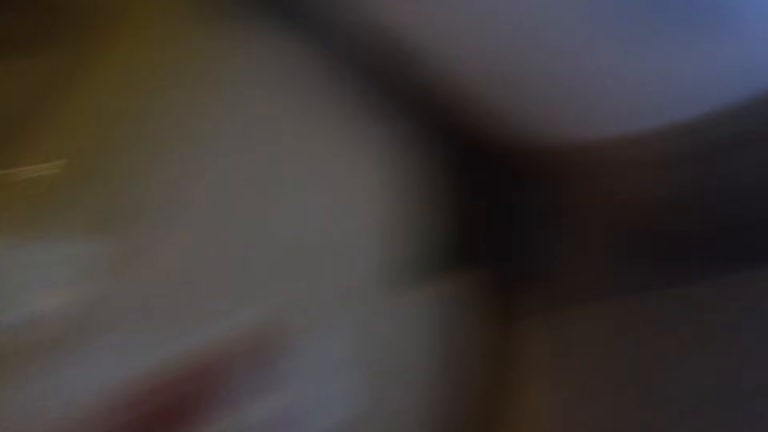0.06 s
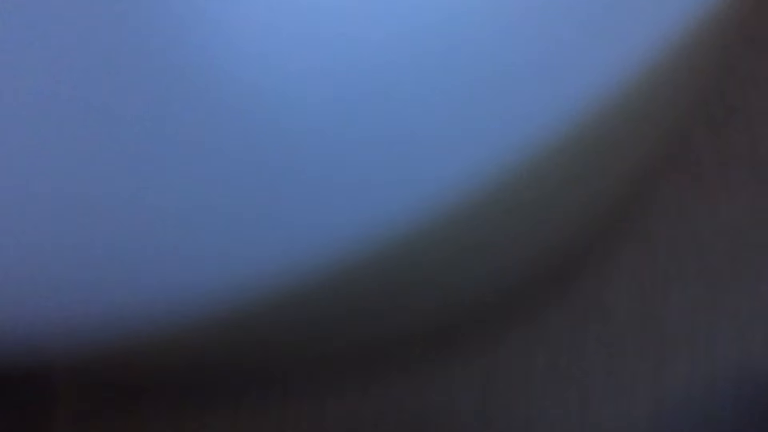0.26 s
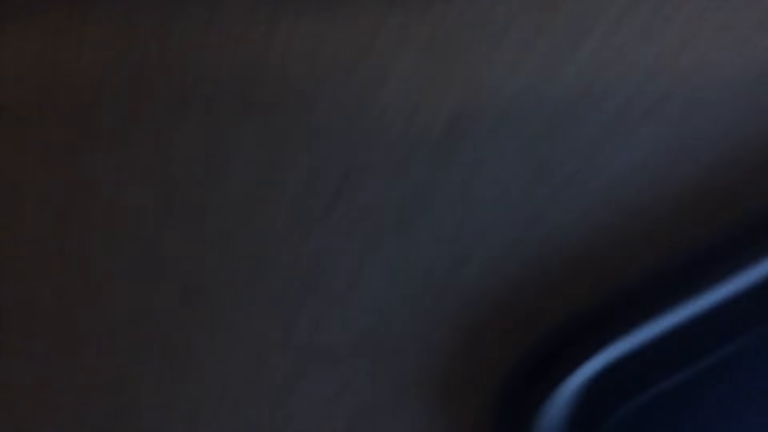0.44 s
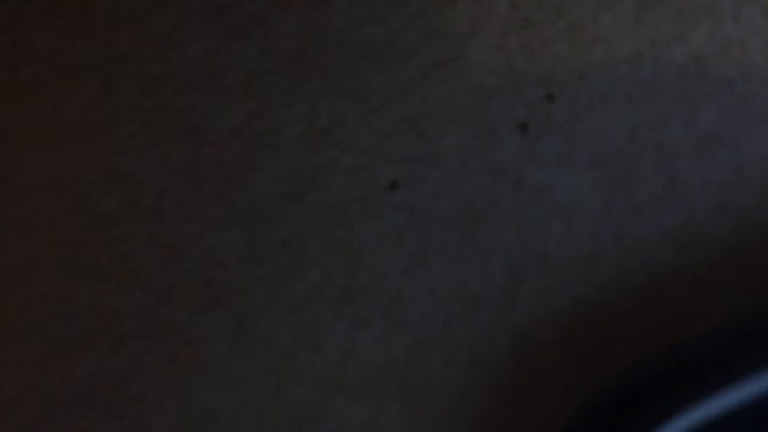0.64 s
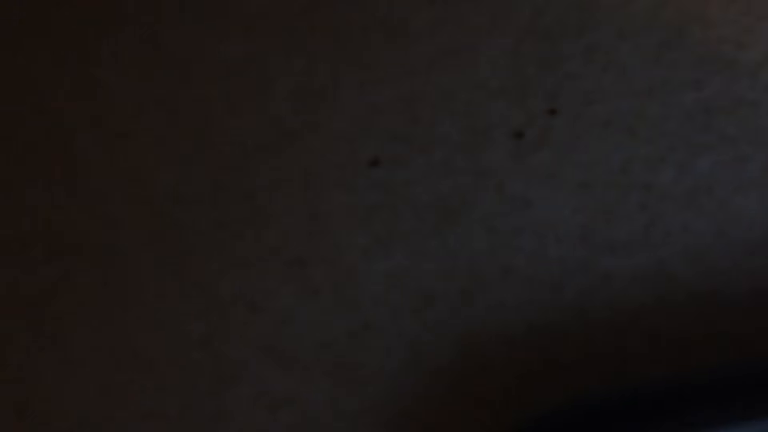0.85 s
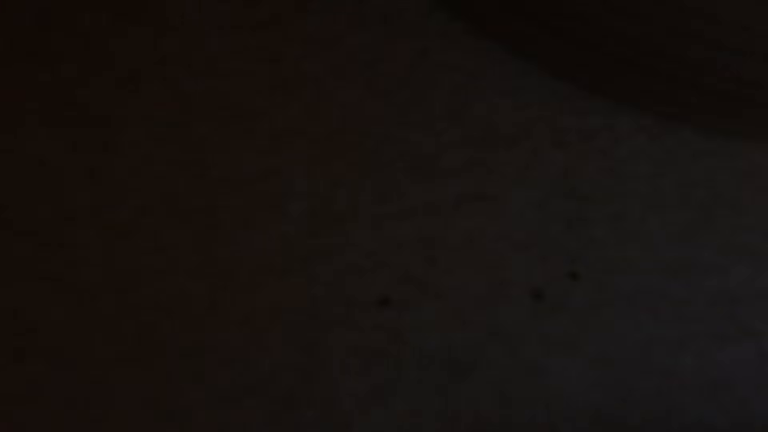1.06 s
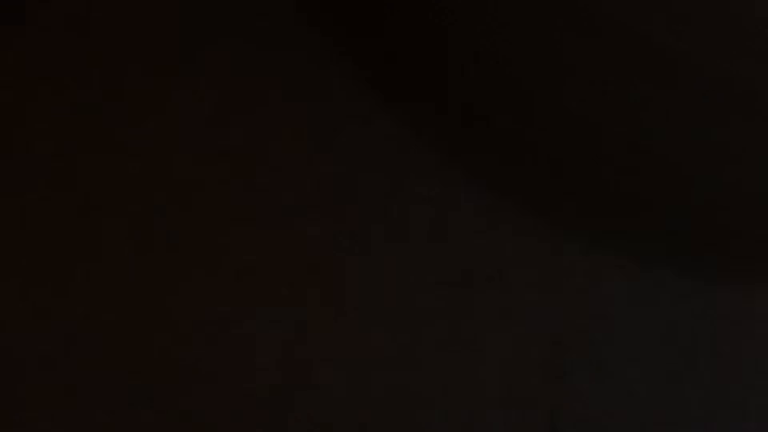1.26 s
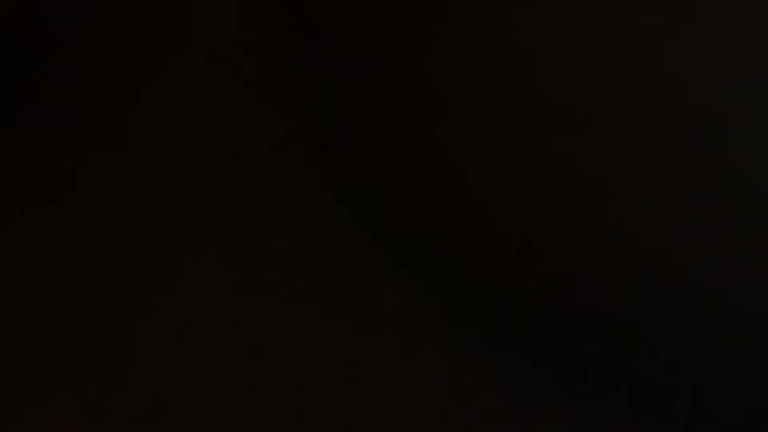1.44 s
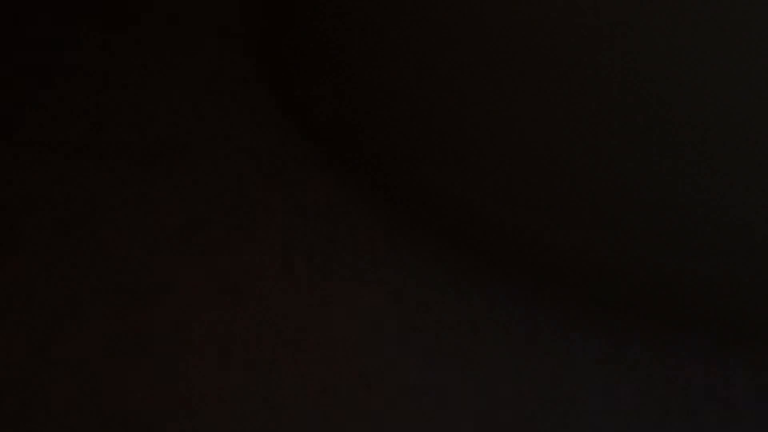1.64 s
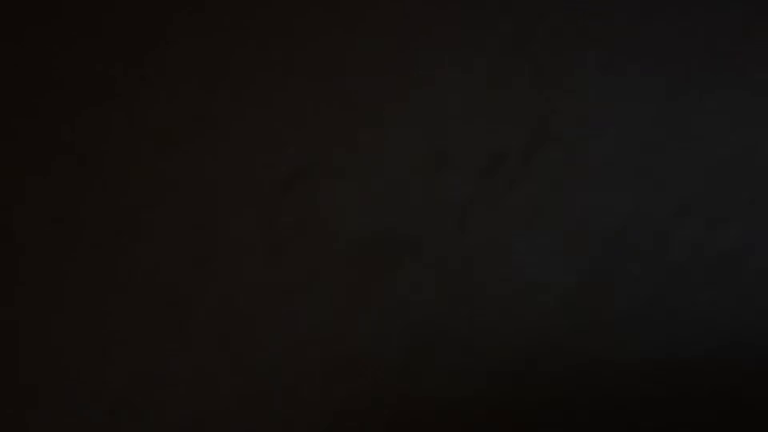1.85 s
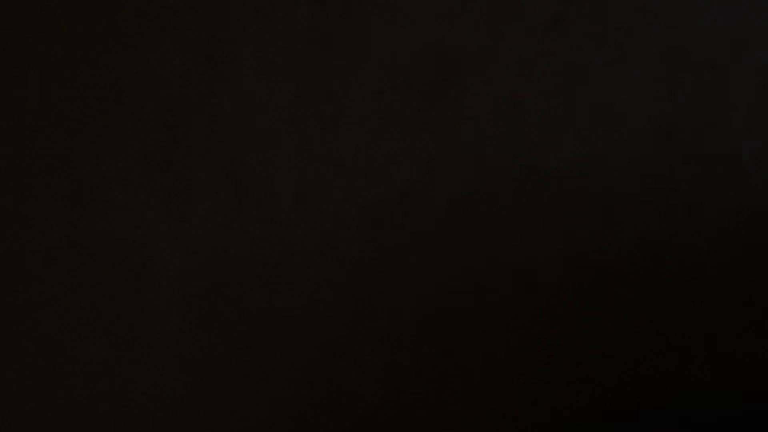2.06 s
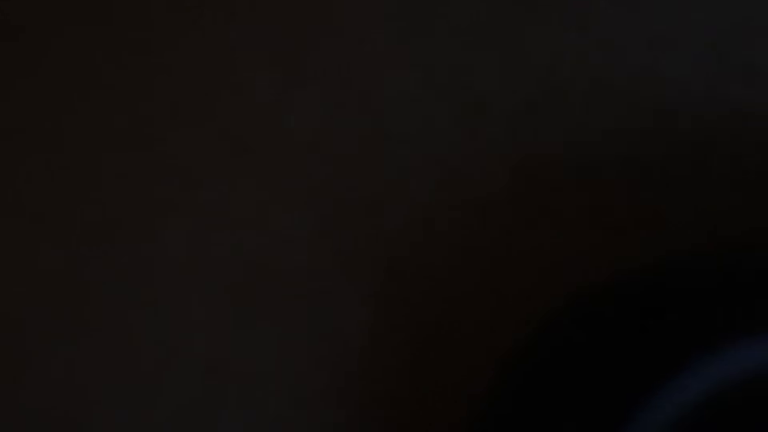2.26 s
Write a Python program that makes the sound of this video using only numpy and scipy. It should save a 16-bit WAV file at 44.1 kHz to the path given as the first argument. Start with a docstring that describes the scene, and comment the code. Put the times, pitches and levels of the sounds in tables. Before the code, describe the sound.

Handcuffs rattle briefly as hands shift, their short damped clinks mixed with dry ratchet snaps and small chain scrapes. The clicks then thin out between soft rubbing and a few knocks, heard up close indoors over a low room hum.

```python
"""Steel handcuffs click and clink as they shift on the wrists, close by in a small quiet room.
Each time their parts meet, the steel cracks and rings briefly, damped by the skin.
The ratchet snaps, the chain links ping and scrape, and hand and cuff meet in a few dull bumps.
Between the clicks the hands rub and skin drags on the cuffs, over a low room hum."""
import sys
import numpy as np
from scipy import signal
from scipy.fft import rfft, irfft, next_fast_len
from scipy.io import wavfile
from scipy.ndimage import map_coordinates

SR = 44100
rng = np.random.default_rng(int(sys.argv[2]) if len(sys.argv) > 2 else 0)


def unload_wav(signal):
    """Save mono or channel-first audio to the path in sys.argv[1] as 16-bit WAV at rate SR, clipped to [-1, 1]."""
    wavfile.write(
        sys.argv[1],
        SR,
        np.round(np.clip(np.atleast_2d(signal).T, -1, 1) * 32767).astype(np.int16),
    )


N = 101429
T = np.arange(SR // 4) / SR  # time within one hit, in seconds

# A "colour" says how strong each frequency is; "t60" is the time a sound takes to fade by 60 dB.
# colour of the room's low rumble (f/Hz, level/dB)
RUMBLE_COLOUR = [(25, -19.5), (60, 10), (100, 5), (180, 14.5), (600, -45.5)]
# colour of the room's steady hiss (f/Hz, level/dB)
ROOM_HISS_COLOUR = [(1500, -20), (3000, -26), (6000, -34.5), (15000, -33)]
# slow rise and fall of hum and rumble together (t/s, gain/dB)
HUM_SWELL = [(0, 1.5), (.8, 3.5), (.93, -4), (1.15, -0.5), (1.55, -2.5), (1.72, -9.5), (1.87, 0), (2.3, 3)]
# how long the room echoes (f/Hz, t60/s)
ROOM_DECAY = [(150, 0.27), (800, 0.034), (3000, 0.27), (12000, 0.16)]

# loudness of skin dragging on the cuff (t/s, level/dB)
DRAG_LEVEL = [(0, -61.5), (.16, -70.5), (.24, -57), (.33, -52.5), (.42, -60), (.72, -71), (.9, -66),
              (.96, -41.5), (1.12, -49), (1.31, -44), (1.42, -63.5), (1.53, -43), (1.62, -81),
              (1.76, -70.5), (1.88, -59), (2.06, -64.5), (2.3, -57.5)]
# dull colour of that drag (f/Hz, level/dB)
DRAG_COLOUR = [(40, -14), (150, -6), (200, -10.5), (250, -14), (310, 0), (340, 5.5), (385, -4.5),
               (520, -13.5), (900, -26), (3000, -60)]
# loudness of the hands rubbing (t/s, level/dB)
RUB_LEVEL = [(0, -62.5), (.2, -63.5), (.27, -35), (.35, -57.5), (.4, -59.5), (.5, -49.5), (.59, -32.5),
             (.67, -44.5), (.76, -45.5), (.84, -64.5), (.872, -45.5), (.915, -55), (.95, -44),
             (1.01, -50.5), (1.11, -39), (1.175, -36), (1.2, -56.5), (1.25, -54), (1.29, -42),
             (1.36, -57.5), (1.43, -67), (1.5, -48.5), (1.6, -51), (1.68, -59.5), (1.76, -68.5),
             (1.95, -73), (2, -41.5), (2.07, -70), (2.155, -56), (2.2, -75.5), (2.26, -47), (2.3, -52.5)]
# hollow colour of the rubbing (f/Hz, level/dB)
RUB_COLOUR = [(60, -18), (190, -17.5), (280, -2.5), (342, 2), (460, -6), (560, 0), (690, 7.5), (745, -1.5),
              (815, 1), (900, -3.5), (1020, 0), (1300, -11), (1450, -12), (1620, -25.5), (2060, -21.5),
              (2450, -31), (3000, -33.5), (6000, -35), (15000, -41)]
# colour of the rumble that comes with the rubbing (f/Hz, level/dB)
HANDLING_COLOUR = [(25, -15), (60, -2), (130, -13), (220, 7.5), (500, -11.5), (2000, -77.5)]
# loudness of the faint sliding hiss (t/s, level/dB)
SLIDE_LEVEL = [(0, -66), (.2, -62), (.36, -61.5), (.48, -77), (.85, -74.5), (1.1, -63.5), (1.3, -73.5),
               (1.54, -62), (1.64, -78), (1.72, -75.5), (1.81, -66), (1.9, -78), (2.1, -79), (2.28, -64.5)]
# colour of that hiss (f/Hz, level/dB)
SLIDE_COLOUR = [(1000, -6), (2800, 0.5), (4500, 1), (6300, 0), (8500, -4), (11000, -8.5), (15000, -14)]
# soft bumps of hand and cuff, and at 1.5596 s a brief 718 Hz ring of the cuff (t/s, level/dB, f/Hz, t60/s)
BUMPS = [(.145, -38, 140.5, 0.088), (0.2356, -9, 188, 0.012), (0.24, -43, 88, .04), (.32, -34, 168, .07),
         (.424, -25.5, 171, 0.024), (0.494, -24.5, 190, 0.029), (0.521, -16.5, 92, 0.043),
         (0.556, -29, 123, 0.14), (0.622, -29.5, 114, 0.088), (1.101, -34, 114, 0.09),
         (1.171, -32, 71, 0.044), (1.28, -35, 84.6, 0.11), (1.5564, -12.5, 435, 0.028),
         (1.5566, -3, 695, 0.0053), (1.556, -23, 211.5, 0.065), (1.5596, -19, 718, 0.032),
         (1.974, -32, 123, 0.078), (2.244, -41.5, 119.6, 0.28)]

# steel sliding on steel (t/s, length/s, level/dB)
SCRAPES = [(0.253, 0.052, -40), (0.315, 0.047, -53), (0.564, 0.043, -37.5), (0.602, 0.082, -50.5),
           (0.684, 0.24, -55), (1.032, 0.31, -58.5)]
# colour of the scrapes (f/Hz, level/dB)
SCRAPE_COLOUR = [(400, -5.5), (1200, 4), (1900, 2.5), (2500, -4.5), (4000, -13.5), (6500, -17.5),
                 (15000, -30)]
# high pings of the small chain links (t/s, level/dB, f/Hz)
LINK_PINGS = [(0.521, -41.5, 10900), (0.5217, -44, 14000), (0.572, -50, 11200), (0.581, -47, 11300),
              (.6185, -46.5, 11200), (.688, -56, 11400), (1.974, -57.5, 12800)]
# dry snaps of the ratchet (t/s, level/dB)
RATCHET_SNAPS = [(.2175, -60.5), (0.2378, -51.5), (0.5228, -30.5), (0.5547, -41.5), (0.622, -49.5),
                 (1.5577, -42), (1.5632, -50), (1.572, -54.5), (1.577, -47.5), (1.9738, -47.5)]
# colour of the snaps (f/Hz, level/dB)
SNAP_COLOUR = [(1500, -33.5), (3000, -4), (4500, 6.5), (6500, 0.5), (10000, -17), (15000, -26.5)]

# steel parts meeting (t/s, hollow ring/dB, low knock/dB, clack/dB, bright tick/dB, treble cutoff/Hz)
CUFF_CLICKS = [(.046, -54, -52, -62.5, -70, 9000), (0.2442, -20.5, -37, -26.5, -32.5, 13500),
               (.266, -24, -32.5, -51, -41.5, 14000), (.283, -29.5, -33.5, -41, -53, 12000),
               (.3032, -32.5, -44, -37.5, -33.5, 5940), (.3078, -35.5, -65, -33.5, -30, 4700),
               (.3105, -67, -59, -69, -30.5, 4100), (.3168, -66, -52, -40, -42, 4200),
               (.366, -50, -75, -61, -50, 5840), (.416, -28.5, -38, -32, -54, 12800),
               (.4205, -59, -73, -29.5, -40.5, 10900), (0.4261, -22, -33.5, -28, -48, 11000),
               (.5216, -62, -22, -16, -38, 14800), (0.5266, -38, -22, -25.5, -52, 2530),
               (.554, -14.5, -26.5, -21.5, -29, 14400), (.5572, -41, -64, -44, -33.5, 15000),
               (.5725, -48, -33, -51, -54, 8900), (.5815, -39, -36, -34.5, -43, 9000),
               (0.6203, -30, -33, -25, -49, 1700), (.642, -35, -62, -60, -69, 6000),
               (.6875, -41, -35.5, -47.5, -53, 12000), (.7055, -28, -39, -39, -48.5, 13000),
               (.731, -36, -61, -45.5, -57, 11000), (0.814, -69, -44, -55, -72, 4000),
               (0.944, -63, -40, -64, -58, 3120), (1.044, -42.5, -36.5, -61, -67, 4000),
               (1.086, -57, -32, -56, -63, 3400), (1.0995, -36.5, -37, -37.5, -56, 1710),
               (1.1105, -41, -50, -34, -62, 1560), (1.1425, -46, -38.5, -41.5, -53, 3520),
               (1.1722, -36, -33.5, -39, -42, 3470), (1.258, -43.5, -66, -63, -68, 2500),
               (1.2815, -31.5, -38, -46.5, -68, 1360), (1.2985, -34.5, -46, -54, -67, 5070),
               (1.5595, -28, -31.5, -58, -38.5, 6000), (1.571, -41, -41, -54, -45, 6000),
               (1.623, -57, -65, -66, -70, 5000), (1.669, -47, -62, -52.5, -56, 5000),
               (1.9738, -44, -25.5, -27.5, -52, 2900), (2.149, -45.5, -50, -72, -58, 5000),
               (2.2475, -49, -51, -49.5, -47, 12500)]
# tones of the cuff's hollow ring (f/Hz, level/dB, t60/s)
RING_TONES = [(600, -13, 0.017), (674, -6, 0.057), (775.7, 3, 0.028), (920, 11, 0.0084), (799.2, -15, 0.12)]
# tones of the low knock (f/Hz, level/dB, t60/s)
KNOCK_TONES = [(222, -12, 0.027), (329.6, 10, 0.045), (497, -21.5, 0.13)]
# middle and high tones of the cuff's curved steel arms (f/Hz, level/dB, t60/s)
ARM_TONES = [(996, 2, 0.13), (1122, 4, 0.071), (1211, -8, 0.12), (1457, 7.5, 0.1), (1592, -8.5, 0.054),
             (2055, 3, 0.067), (2194, -2.5, 0.015), (2620, -9, 0.062), (2824, 6, 0.06),
             (3280, -19.5, 0.031), (3500, -11.5, 0.022), (4020, -6, 0.013)]
# the steel's highest tones (f/Hz)
SHIMMER_HZ = [4690, 5590, 6100, 7230, 8130, 9100, 10100, 13000]
# colour of the clack of a contact (f/Hz, level/dB)
CLACK_COLOUR = [(40, -49), (150, -17.5), (400, 0), (1000, 8.5), (1700, -2), (2200, 1), (2550, -6.5),
                (3100, -4), (3900, -11), (5500, -19.5), (8000, -28), (15000, -30.5)]
# colour of the bright tick of a contact (f/Hz, level/dB)
TICK_COLOUR = [(1000, -37), (3000, 4), (5000, -4), (7000, -3.5), (9000, 1.5), (11500, -7.5), (15000, 2.5)]


def amp(db):
    """Turn decibels into a number to multiply by."""
    return 10 ** (np.asarray(db) / 20)


def unit(x):
    """Scale a sound to an average strength (rms) of 1."""
    return x / np.sqrt(np.mean(x ** 2) + 1e-20)


def unit_hit(x):
    """Give a hit the same energy as 5 ms of sound at strength 1."""
    return x * np.sqrt(.005 * SR / np.sum(x ** 2))


def fade(t60):
    """Die away by 60 dB every t60 seconds."""
    return np.exp(-np.log(1000) * T / t60)


def rise(rise_s):
    """Climb smoothly from 0 towards 1."""
    return 1 - np.exp(-T / rise_s)


def at_hz(points, hz):
    """Read between (f/Hz, value) points, with every octave equally wide."""
    freqs, values = np.transpose(points)
    return np.interp(np.log(hz + 1), np.log(freqs), values)


def curve(points):
    """Join (t/s, value) points with straight lines, one value per sample."""
    return np.interp(np.arange(N) / SR, *np.transpose(points))


def coloured(x, colour):
    """Filter a sound to the given colour."""
    size = 2 * next_fast_len(len(x))
    gain = amp(at_hz(colour, np.fft.rfftfreq(size, 1 / SR)))
    cepstrum = irfft(np.log(gain))
    # fold onto the first half, so the filter rings only after a hit, never before
    cepstrum[1:size // 2] *= 2
    cepstrum[size // 2 + 1:] = 0
    return irfft(rfft(x, size) * np.exp(rfft(cepstrum)))[:len(x)]


def add(track, start_s, x):
    """Mix a sound into the track at the given time."""
    part = track[round(start_s * SR):][:len(x)]
    part += x[:len(part)]


def kicks(per_s):
    """Tiny pushes up or down at random moments."""
    return (rng.random(N) < per_s / SR) * rng.choice([-1, 1], N)


def slips():
    """Skin sticks and slips in tiny uneven steps, over the noise of smooth sliding."""
    steps = kicks(per_s=820) * amp(5 * rng.standard_normal(N))
    return unit(steps) + amp(-1.5) * rng.standard_normal(N)


def ringing(tones, rise_s, scatter_db, detune):
    """A struck part rings with fading tones, a little different in level and pitch each time."""
    hz, db, t60 = np.transpose(tones)[:, :, None]
    level_luck, pitch_luck = rng.standard_normal((2, len(tones), 1))
    pitch = hz * (1 + detune * pitch_luck)
    waves = amp(db + scatter_db * level_luck) * fade(t60) * np.sin(2 * np.pi * pitch * T)
    signs = (-1) ** np.arange(len(tones))[:, None]  # every second tone starts downwards
    return unit_hit((waves * signs).sum(0) * rise(rise_s))


def crack(colour, t60, spike_db, rise_s):
    """A hard contact gives one sharp spike, then a dense chatter that builds and fades."""
    burst = rng.standard_normal(len(T)) * fade(t60) * rise(rise_s)
    burst /= np.linalg.norm(burst)
    burst[0] -= amp(spike_db)
    return unit_hit(coloured(burst, colour))


def in_room(hit, echo_db=-20):
    """The small room adds a short echo: noise that fades at its own speed in each band."""
    hz, t, bands = signal.stft(rng.standard_normal(len(T)), SR, nperseg=256)
    decay = np.exp(-np.log(1000) * t / at_hz(ROOM_DECAY, hz)[:, None])
    tail = signal.istft(bands * decay, SR, nperseg=256)[1][:len(T)] * rise(.0033)
    echo = signal.fftconvolve(hit, tail / np.linalg.norm(tail))[:len(hit)]
    return hit + amp(echo_db) * echo


def room_tone(hum_hz=125.3, half_width_hz=4.6, waver_db=2.5, wavers_per_s=13):
    """The room has a faint steady hiss, plus a low hum and rumble that rise and fall."""
    hz = np.fft.rfftfreq(N, 1 / SR)
    narrow_peak = 1 / (1 + ((hz - hum_hz) / half_width_hz) ** 2)
    hum = irfft(rfft(rng.standard_normal(N)) * narrow_peak, N)
    position = np.arange(N) * wavers_per_s / SR
    waver = map_coordinates(rng.standard_normal(int(position[-1]) + 2), [position])  # smooth and random
    hum = amp(-55.5) * unit(hum * amp(waver_db * waver))
    rumble = amp(-56) * unit(coloured(rng.standard_normal(N), RUMBLE_COLOUR))
    hiss = amp(-72) * unit(coloured(rng.standard_normal(N), ROOM_HISS_COLOUR))
    return amp(curve(HUM_SWELL)) * (rumble + hum) + hiss


def skin_drag():
    """Skin drags on the cuff with a dull, hollow sound."""
    return amp(curve(DRAG_LEVEL)) * unit(coloured(slips(), DRAG_COLOUR))


def hand_rub():
    """The slipping hands stir the hollow body and a low rumble, with a faint sliding hiss."""
    hollow = unit(coloured(slips(), RUB_COLOUR))
    rumble = amp(-9.5) * unit(coloured(slips(), HANDLING_COLOUR))
    hiss = unit(coloured(rng.standard_normal(N), SLIDE_COLOUR))
    return amp(curve(RUB_LEVEL)) * (hollow + rumble) + amp(curve(SLIDE_LEVEL)) * hiss


def soft_bumps():
    """Hand and cuff meet softly, giving one low tone that quickly dies; one entry is instead a brief hollow
    ring of the cuff."""
    out = np.zeros(N)
    for start_s, db, hz, t60 in BUMPS:
        swing = -np.sin(2 * np.pi * hz * T) * fade(t60) * rise(.00088)
        add(out, start_s, amp(db) * swing)
    return out


def link_scrapes(rise_s=.0009):
    """The links grate on each other in tiny catches: a quick start, then a steady fade."""
    level = np.zeros(N)
    for start_s, length_s, db in SCRAPES:
        peak_s = start_s + rise_s
        level += amp(db) * curve([(start_s, 0), (peak_s, 1), (peak_s + length_s, 0)])
    catches = kicks(per_s=2200) * amp(4 * rng.uniform(-1, 1, N))
    return level * unit(coloured(catches, SCRAPE_COLOUR))


def link_pings(width_hz=1100):
    """A jolted link chatters for a moment around its own very high pitch."""
    out = np.zeros(N)
    for start_s, db, hz in LINK_PINGS:
        chatter = rng.standard_normal(len(T)) * fade(t60=.017)
        band = signal.butter(2, [hz - width_hz / 2, hz + width_hz / 2], "bandpass", fs=SR)
        ping = unit_hit(signal.lfilter(*band, chatter))
        add(out, start_s, amp(db) * in_room(ping))
    return out


def ratchet():
    """The ratchet's catch slips over a tooth with a dry snap that hardly rings."""
    out = np.zeros(N)
    for start_s, db in RATCHET_SNAPS:
        snap = crack(SNAP_COLOUR, t60=.0025, spike_db=3, rise_s=.0002)
        add(out, start_s, amp(db) * in_room(snap))
    return out


def cuff_clicks(arms_db=-13, shimmer_db=-14, shimmer_t60=.022, tick_delay_s=.0011):
    """Each contact cracks, rings the steel briefly and knocks the hollow body behind it."""
    out = np.zeros(N)
    shimmer_tones = [(hz, 0, shimmer_t60) for hz in SHIMMER_HZ]
    for start_s, ring_db, knock_db, clack_db, tick_db, cutoff_hz in CUFF_CLICKS:
        ring = ringing(RING_TONES, rise_s=.0014, scatter_db=1.5, detune=.01)
        knock = ringing(KNOCK_TONES, rise_s=.0007, scatter_db=2, detune=.025)
        clack = crack(CLACK_COLOUR, t60=.039, spike_db=-1.5, rise_s=.00006)
        tick = crack(TICK_COLOUR, t60=.013, spike_db=-6, rise_s=.0007)
        # the steel's own tones join the clack and the tick
        clack += amp(arms_db) * ringing(ARM_TONES, rise_s=.0003, scatter_db=3, detune=.003)
        tick += amp(shimmer_db) * ringing(shimmer_tones, rise_s=.0006, scatter_db=3, detune=.012)
        late_tick = np.pad(tick, (round(tick_delay_s * SR), 0))[:len(T)]
        hit = amp(ring_db) * ring + amp(knock_db) * knock
        hit += amp(clack_db) * clack + amp(tick_db) * late_tick
        treble_cut = signal.butter(2, cutoff_hz, fs=SR)
        add(out, start_s, in_room(signal.lfilter(*treble_cut, hit)))
    return out


def scene():
    """Cuffs, hands and room all reach one close microphone."""
    steel = cuff_clicks() + ratchet() + link_pings() + link_scrapes()
    hands = soft_bumps() + hand_rub() + skin_drag()
    return (steel + hands + room_tone())[None]


def record(dry, low_hz=40, top_hz=15400):
    """Soften the deepest bass and cut off the very highest treble."""
    bass_cut = signal.lfilter(*signal.butter(2, low_hz, "highpass", fs=SR), dry)
    size = next_fast_len(N + SR // 2)
    steep_edge = 1 / (1 + (np.fft.rfftfreq(size, 1 / SR) / top_hz) ** 90)
    return irfft(rfft(bass_cut, size) * steep_edge, size)[:, :N]


dry = scene()
out = record(dry)
unload_wav(out)
```